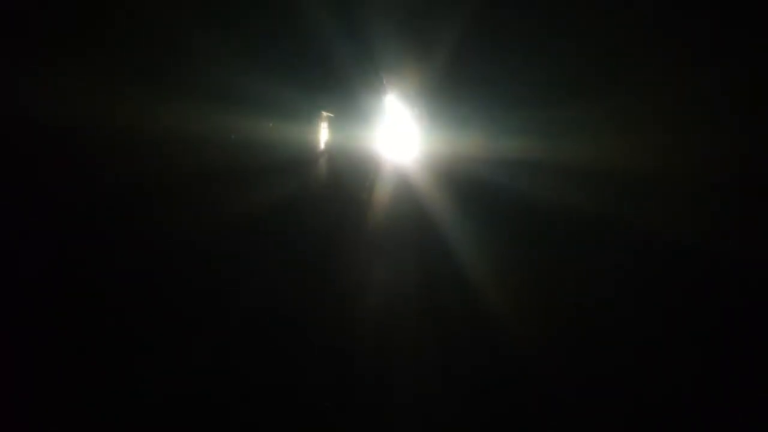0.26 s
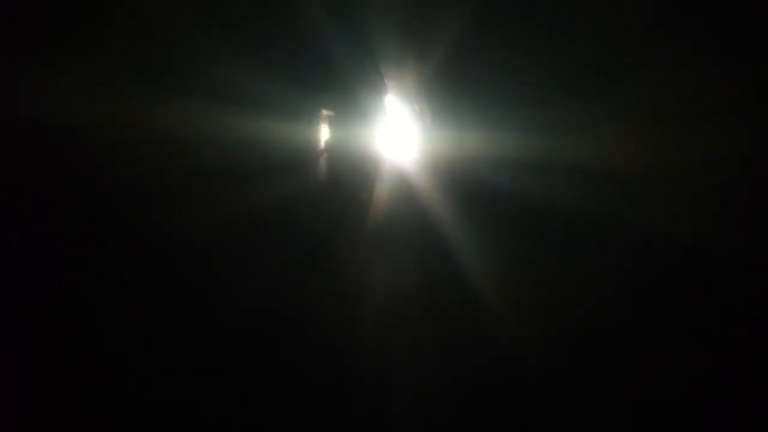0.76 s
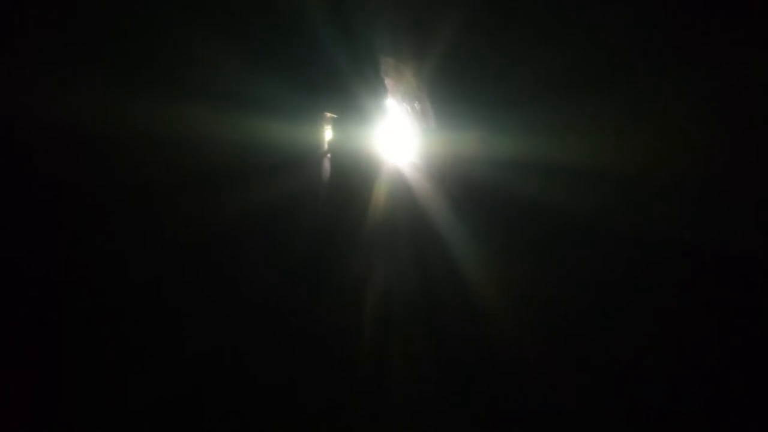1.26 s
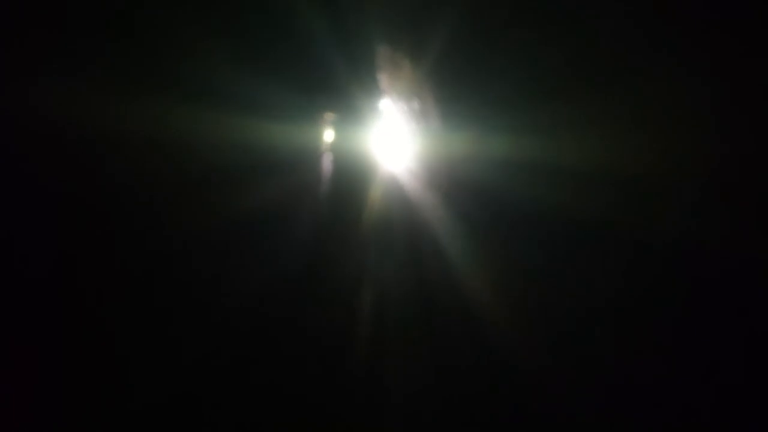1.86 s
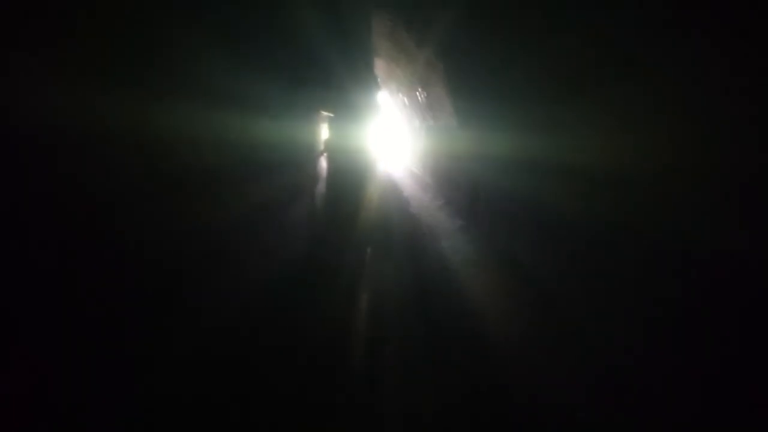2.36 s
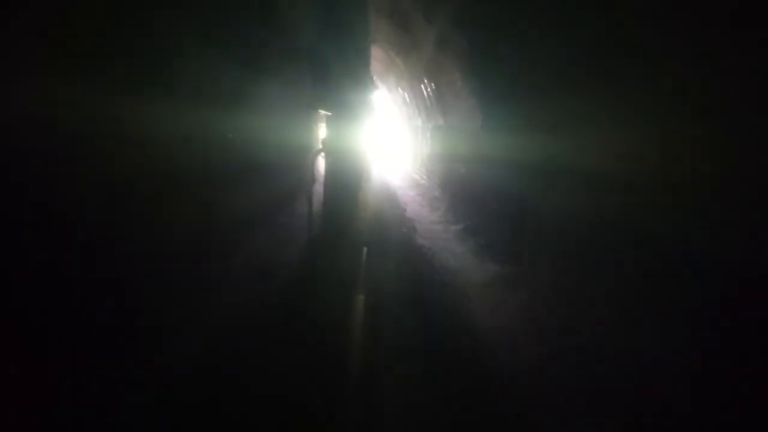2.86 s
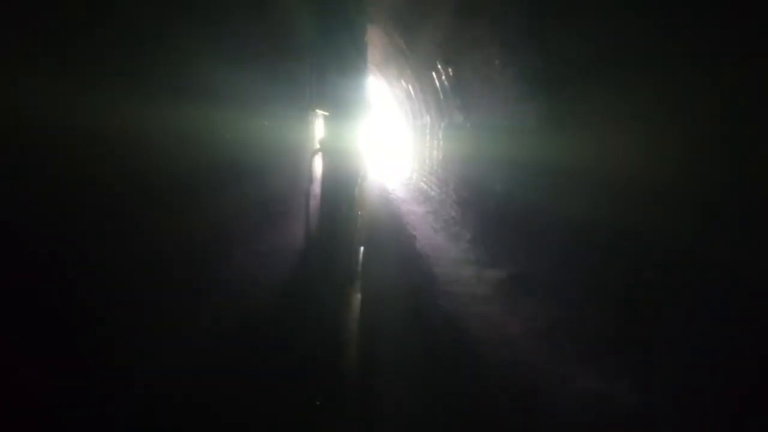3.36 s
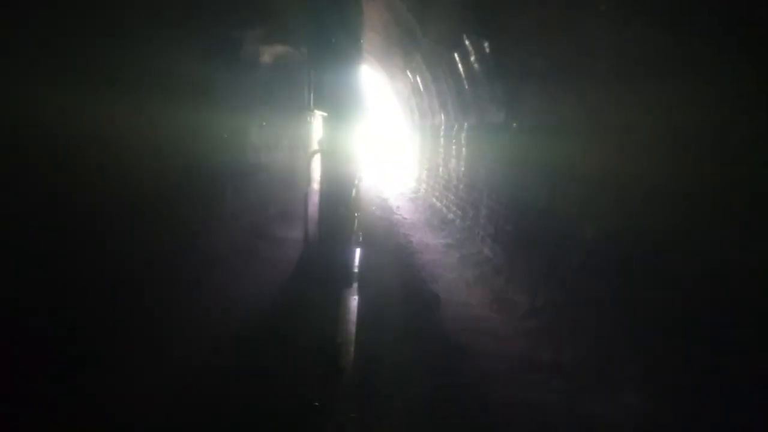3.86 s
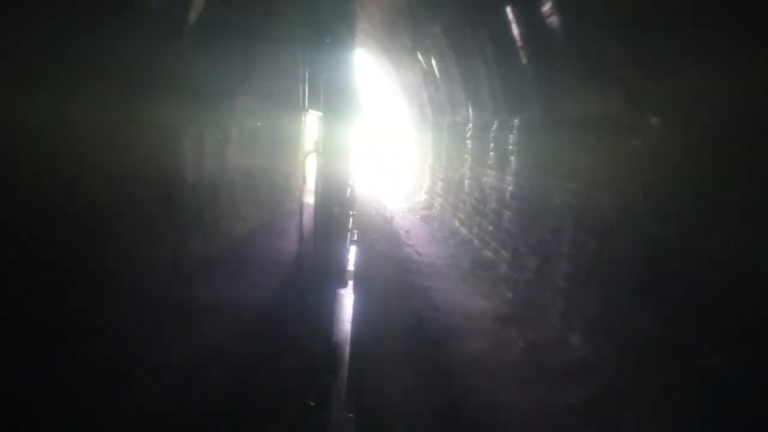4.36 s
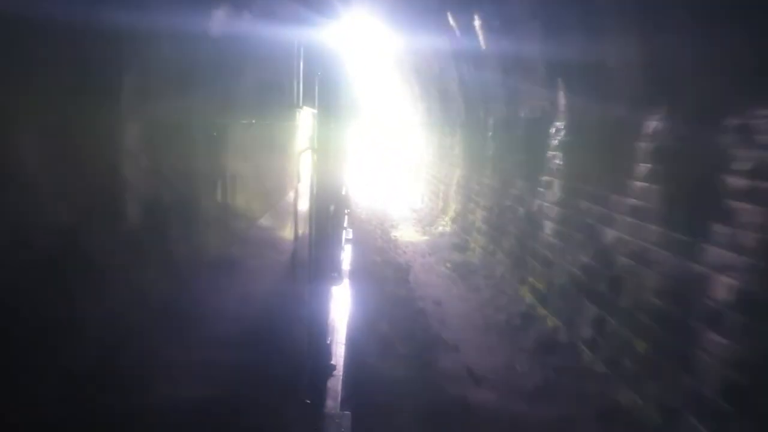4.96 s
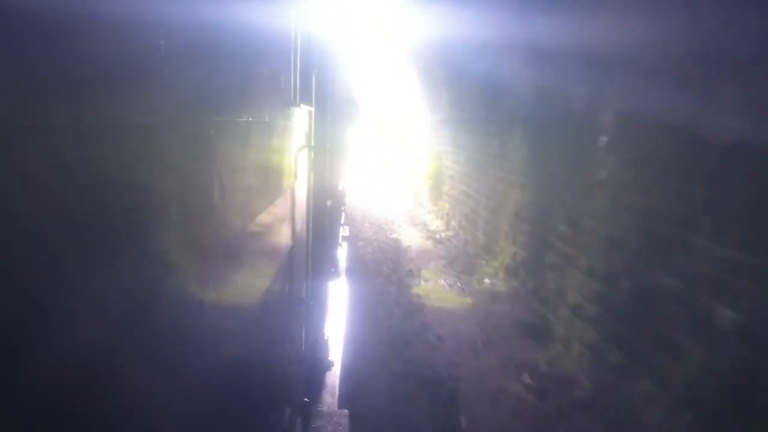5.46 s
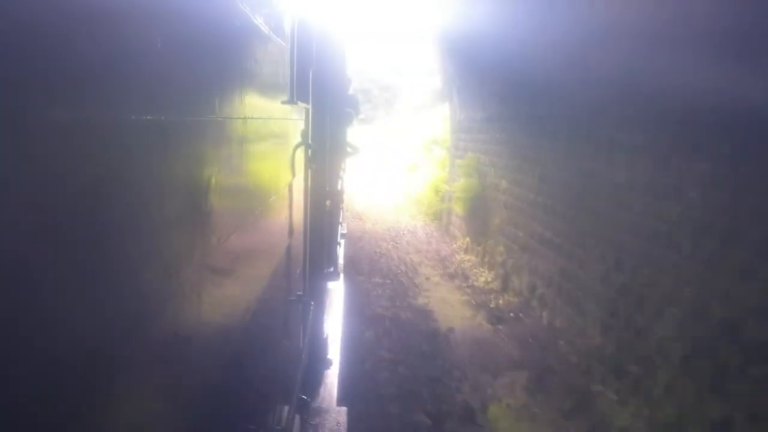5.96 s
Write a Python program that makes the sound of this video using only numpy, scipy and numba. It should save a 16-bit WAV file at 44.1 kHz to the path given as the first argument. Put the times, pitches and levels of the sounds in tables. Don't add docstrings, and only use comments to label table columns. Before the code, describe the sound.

A phone at a train window hears a reverberant tunnel. From 0 s an uneven diesel throb, deep and booming around 75 firings per second, surges and sags over a continuous low roar of wheels on rails. Muffled joint thuds and underframe knocks fall irregularly through the first 2.3 s, with a brief loose rattle near 1.1 s. From about 2.5 s the jolts become closer and brighter. At 2.9 s a coupling creaks low, then higher and louder at 3.1 s with a short metallic singing tone, and a heavy thud lands at 3.25 s. More clattering thumps follow at 3.6, 4.0, 4.6, 5.0-5.1 and 5.5 s, with fine treble rattle. The engine recedes, while a faint hissy turbo whistle, clearer from 3.8 s, keeps falling. Closing thuds cluster from 5.9 s to 6.2 s as the engine swells again.

```python
import sys
import numpy as np
from scipy import signal
from scipy.fft import rfft, irfft, next_fast_len
from scipy.io import wavfile
from scipy.ndimage import uniform_filter1d
from numba import njit

SR = 44100
rng = np.random.default_rng(int(sys.argv[2]) if len(sys.argv) > 2 else 0)


def gain_from_db(level_db):
    decades = np.asarray(level_db, float) / 20
    return 10 ** decades


def store_pcm(level_fs):
    pcm = np.round(np.clip(level_fs, -1, 1) * 32767).astype(np.int16)
    wavfile.write(sys.argv[1], SR, np.atleast_2d(pcm).T)


N = 274297
T = np.arange(N) / SR
SIZE = next_fast_len(N + 4096)
HZ = np.maximum(np.arange(SIZE // 2 + 1) * SR / SIZE, 1)


def level(x, db):
    return x * gain_from_db(db) / np.sqrt(np.mean(x ** 2))


def across(table, column):
    table = np.array(table, float)
    return np.interp(np.log(HZ), np.log(table[:, 0]), table[:, column])


def coloured(spectrum):
    return rfft(rng.standard_normal((2, SIZE))) * gain_from_db(across(spectrum, column=1))


def filtered(x, order, hz, kind="low"):
    return signal.sosfilt(signal.butter(order, hz, kind, fs=SR, output="sos"), x)


def walk(rate_hz):
    hold = int(SR / rate_hz)
    steps = np.repeat(rng.standard_normal(N // hold + 1), hold)
    return 1.351 * uniform_filter1d(uniform_filter1d(steps, hold), hold)[:N]


def phase(hz):
    return 2 * np.pi * np.cumsum(hz) / SR


def resonate(x, modes):
    out = 0
    for k, (hz, width_hz, db) in enumerate(modes):
        b, a = signal.iirpeak(hz, hz / width_hz, SR)
        ring = signal.lfilter(b, a, signal.lfilter(b, a, x))
        out = out + (-1) ** k * gain_from_db(db) * ring
    return out


def pulses(hz, jitter, scatter_db):
    uneven_hz = hz * (1 + jitter * walk(np.mean(hz)))
    cycle = np.cumsum(uneven_hz / SR).astype(int)
    size = gain_from_db(scatter_db * rng.standard_normal(cycle[-1] + 1))
    return np.diff(cycle, prepend=0) * size[cycle], cycle


@njit
def walls(x, lags, gain, damp):
    line, soft, out = np.zeros((8, 4096)), np.zeros(8), np.zeros((2, len(x)))
    for i in range(len(x)):
        total = 0.
        for k in range(8):
            soft[k] += (1 - damp) * (gain[k] * line[k, (i - lags[k]) & 4095] - soft[k])
            total += soft[k]
            out[k % 2, i] += soft[k]
        for k in range(8):
            line[k, i & 4095] = x[i] + soft[k] - total / 4
    return out


def tunnel(x, wet_db, t60_s):
    lags = rng.integers(700, 2800, size=8)
    echo = walls(x, lags, gain_from_db(-60 * lags / SR / t60_s), 0.1)
    return x * np.array([[1], [.6]]) + gain_from_db(wet_db) * echo


def swell(start_s, length_s, rise_s):
    fall = (start_s + length_s + .5 * rise_s - T) / 2
    return np.clip(np.minimum(T - start_s, fall) / rise_s, 0, 1)


def mouth(s):
    # [t/s, nearness/0-1]
    nearness = [
        (0, 0.099),
        (1., 0.12),
        (2.3, 0.15),
        (2.6, 0.69),
        (3.7, 0.62),
        (4.0, 1),
        (5.5, 0.93),
        (5.9, 0.6),
        (6.22, 1.),
    ]
    return np.interp(s, *np.transpose(nearness))


def engine():
    cylinders_db = [-7, -1.5, 0, -9.5, -0.5, 3.5]
    # [f/Hz, width/Hz, level/dB]
    exhaust = [(67.6, 59, -8), (108, 30.5, 0), (148.6, 15.8, -6), (230.9, 36, -8.5), (331.5, 40.7, -7.5)]
    # [t/s, level/dB]
    load = [(0, -20), (0.3, -17), (0.45, -20.5), (0.7, -16.5), (1.1, -21.5), (1.25, -22), (1.7, -18),
            (2.0, -21.5), (2.4, -24), (2.85, -20), (3.1, -27.5), (3.4, -24.5), (3.7, -28.5), (3.85, -22),
            (4.6, -27.5), (5.1, -29), (5.9, -23.5), (6.22, -19)]
    firing_hz = 75.92
    fire, cycle = pulses(np.full(N, firing_hz), jitter=.065, scatter_db=4.)
    fire = fire * gain_from_db(np.array(cylinders_db)[cycle % len(cylinders_db)])
    boom = tunnel(resonate(fire, exhaust), wet_db=-1.0, t60_s=1.34)
    boom = boom / np.sqrt(uniform_filter1d(boom[0] ** 2, SR // 6))
    return boom * gain_from_db(0.5 + np.interp(T, *np.transpose(load)))


def hum():
    # [t/s, length/s, start f/Hz, end f/Hz, level/dB]
    surges = [(0.0, .36, 80, 70, -18.5), (.41, .14, 73, 74, -17), (0.603, 0.23, 77, 73, -17),
              (.88, .2, 72, 70, -19), (1.138, .2, 75, 76, -16), (1.38, 0.16, 74, 71, -18.5),
              (1.582, .17, 72, 75, -17.5), (1.785, 0.19, 82, 83, -21), (2.177, 0.12, 76, 79, -21),
              (2.62, 0.13, 83, 82, -22), (2.77, 0.19, 74, 73, -20), (3.27, 0.22, 80, 80, -25),
              (3.714, .08, 78, 78, -17.5), (5.2, 0.12, 78, 78, -24), (5.89, 0.06, 78, 79, -19)]
    out = np.zeros(N)
    for s, length_s, hz0, hz1, db in surges:
        turn = phase(np.interp(T, [s, s + length_s], [hz0, hz1]))
        out += gain_from_db(db + 1) * np.sin(turn) * swell(s, length_s, rise_s=0.038)
    return out


def turbo():
    # [t/s, whistle f/Hz, level/dB]
    run_down = [(0, 7886, -65), (1, 7410, -63), (2, 7065, -61.5), (2.6, 6695, -58), (3.3, 6560, -62),
                (3.799, 6460, -51), (4.3, 6370, -51.5), (4.801, 6170, -55.5), (5.2, 6000, -55),
                (5.7, 5670, -54), (6.22, 5570, -59)]
    s, hz, db = np.transpose(run_down)
    turn = phase(np.interp(T, s, hz))
    blur = filtered(rng.standard_normal((2, 2, N)), 2, 190.)
    whistle = level(blur[0] * np.cos(turn) + blur[1] * np.sin(turn), 0) * gain_from_db(np.interp(T, s, db))
    rush = filtered(rng.standard_normal((2, 2, N)), 3, 600.)
    intake = rush[0] * np.cos(0.72 * turn) + rush[1] * np.sin(.94 * turn)
    return whistle + level(intake, -63.0)


def rolling():
    # [f/Hz, level/dB per Hz]
    roar = [(15, -31), (25, -16), (83, -0.5), (328, -6.5), (417, -12.5), (558, -11), (1000, -23),
            (2050, -32.5), (4920, -49), (6420, -46), (7530, -57), (8250, -71), (8750, -64), (9310, -55.5),
            (11500, -57), (12800, -64), (14400, -74)]
    mouth_gain_db = [-0.23, -0.4, 2]
    noise, sway, out = coloured(roar), walk(7.), 0
    for octave in np.arange(4.5, 14.5, .5):
        band = np.cos(np.pi / 2 * np.clip((np.log2(HZ) - octave) * 2, -1, 1)) ** 2
        place = np.interp(octave, [9, 11, 13.5], [0, 1, 2])
        slow_db = np.interp(place, np.arange(3), mouth_gain_db) * mouth(T)
        gain_db = slow_db + .5 * sway + .9 * walk(12.)
        out = out + irfft(noise * band, SIZE)[:, :N] * gain_from_db(gain_db)
    return level(out, -19.0)


def knocks():
    # [t/s, peak
    # level/dB, f/Hz, length/s]
    parts = [(0.333, -13, 137, 0.1), (0.625, -14, 128, 0.037), (0.675, -17, 270, 0.036),
             (0.747, -6, 133, 0.04), (0.925, -14, 154, 0.076), (1.172, -16, 498, 0.021),
             (1.259, -17, 130, 0.022), (1.535, -16.5, 119.8, 0.112), (1.725, -11, 313, 0.037),
             (1.834, -16, 278, 0.033), (2.144, -9, 292, 0.022), (2.144, -17, 522, 0.022),
             (2.172, -12, 132.4, 0.088), (2.417, -19, 265, 0.08), (2.515, -16, 519, 0.032),
             (2.572, -14, 298, 0.05), (3.008, -18, 563, 0.031), (3.079, -18, 246, 0.11),
             (3.127, -17.5, 600, 0.11), (3.213, -11, 126, 0.15), (3.27, -13, 290, 0.023),
             (3.625, -19.5, 155.2, 0.073), (3.629, -12, 281, 0.034), (3.646, -18, 490, 0.044),
             (3.67, -13, 313, 0.046), (3.705, -20, 544, 0.053), (3.963, -10.5, 144.3, 0.1),
             (3.984, -15, 281, 0.096), (3.998, -18, 592, 0.042), (4.567, -8, 280, 0.066),
             (4.632, -15, 563, 0.017), (4.729, -18, 291, 0.012), (4.769, -18, 512, 0.039),
             (4.843, -15, 285, 0.026), (4.923, -11, 142, 0.052), (4.954, -21, 250, 0.012),
             (5.022, -20, 536, 0.036), (5.057, -10, 128.3, 0.135), (5.087, -20, 525, 0.12),
             (5.096, -11.5, 274, 0.041), (5.435, -20, 122, 0.037), (5.457, -14.5, 267, 0.067),
             (5.519, -18, 514, 0.033), (5.596, -15, 155, 0.037), (5.93, -10, 292, 0.032),
             (6.058, -18.5, 510, 0.056),
             (2.64, -12.5, 160, 0.036), (3.04, -12, 95, 0.11), (3.42, -13.5, 180, 0.047),
             (5.86, -13.5, 205, .1), (5.97, -16.5, 540, .05), (6.08, -14.5, 500, .05),
             (6.175, -12, 230, .04), (5.14, -16, 390, 0.065), (3, -14.5, 350, 0.052),
             (0.0502, -28.5, 930, .5), (.55, -29, 930, 0.41)]
    out, rows = np.zeros(N), parts
    for (s, db, hz, length_s), chance in zip(rows, rng.random((len(rows), 2))):
        i = int(s * SR)
        t = T[:N - i][:SR]
        rise = 1 - np.exp(-(t / (0.25 * length_s)) ** 2)
        shape = rise * np.exp(-(t / (0.83 * length_s)) ** 2)
        turn = 2 * np.pi * hz * t
        neighbour = np.sin((.8 + .45 * chance[0]) * turn + 2 * np.pi * chance[1])
        out[i:i + len(t)] += gain_from_db(db - 3.5) * shape * (np.sin(turn) + 0.33 * neighbour)
    return out * np.array([[1], [.6]])


def loose(t, length_s):
    start = 1 - np.exp(-(t / .022) ** 1.5)
    return start * (np.exp(-(t / length_s) ** 1.15) + 0.18 * np.exp(-t / 0.14))


def joints():
    # [t/s, clatter level/dB, thud level/dB, thud f/Hz]
    far_joints = [(0.109, -22, -18, 102), (0.235, -19.5, -7.5, 155), (0.507, -22.5, -15.5, 156),
                  (0.640, -20, -7.5, 98.4), (1.054, -20.5, -9.5, 114.2), (1.272, -33.5, -10, 108.5),
                  (1.469, -25, -11, 224), (1.651, -20.5, -22, 148), (1.759, -29, -17, 340),
                  (2.14, -17, -12, 286.5), (2.326, -22.5, -21, 230)]
    # [t/s, clatter level/dB, thud level/dB, thud f/Hz, jolt length/s]
    near_joints = [(2.535, -19, -5.5, 346, 0.025), (2.583, -19, -37, 331.6, 0.046),
                   (2.967, -17.5, -21, 138.5, 0.1), (3.115, -19.5, -39, 396, 0.11),
                   (3.246, -15.5, 1.5, 108, 0.032), (3.442, -31.5, -25, 106, .028),
                   (3.625, -13, -2, 150, 0.052), (3.991, -13.5, -19, 133.4, 0.063),
                   (4.29, -24, -12, 323, 0.025), (4.45, -20.5, -31, 164, .059),
                   (4.584, -20, -10, 277, 0.046), (4.728, -19, -25, 151, 0.057),
                   (4.960, -16.5, -6.5, 193.4, 0.027), (5.098, -15.5, -5.5, 297, 0.057),
                   (5.46, -15, -4.5, 265.4, 0.067), (5.926, -17, -3.5, 327, 0.039),
                   (6.039, -16, -8, 211, 0.063), (6.159, -28.5, -6, 143.3, 0.056)]
    # [t/s, level/dB]
    shakes = [
        (1.130, -43),
        (1.385, -61),
        (2.229, -61),
        (2.605, -66),
        (2.965, -50),
        (3.849, -54),
        (5.31, -51),
    ]
    # [f/Hz, level/dB per Hz]
    clatter_colour = [(180, -23), (300, 3.5), (656, -13), (829, -6), (1030, -15.5), (2590, -27),
                      (3280, -37), (6330, -35), (8000, -43), (10400, -78), (17600, -120)]
    # [f/Hz, level/dB per Hz]
    rattle_colour = [(6500, -34), (8300, -9.5), (9600, -7.5), (10400, -5), (11100, -2.5), (12300, -5),
                     (13200, -4.5), (14300, -26), (14500, -75)]
    far_jolt_s, shake_s = 0.051, 0.031
    dull_hz, dull_share = 2560, .7

    clatter_env, rattle_env, thud = np.zeros((3, N))
    rows = [(*row, far_jolt_s) for row in far_joints] + list(near_joints)
    for (s, clatter_db, thud_db, thud_hz, length_s), chance in zip(rows, rng.random((len(rows), 2))):
        i = int(s * SR)
        t = T[:N - i][:SR // 2]
        shape = (1 - np.exp(-t / 0.019)) * np.exp(-(t / (1.476 * length_s)) ** 1.03)
        blow = shape * (1 - np.exp(-t / 0.0035)) / np.maximum(1 - np.exp(-t / 0.021), 1e-9)
        shape = shape + 0.11 * (1 - np.exp(-t / 0.037)) * np.exp(-t / .12)
        clatter_env[i:i + len(t)] += gain_from_db(clatter_db) * shape
        rattle_db = -39 + 1.3 * (clatter_db + 15) - 20 * (1 - mouth(s))
        rattle_env[i:i + len(t)] += gain_from_db(rattle_db) * loose(t, length_s)
        turn = 2 * np.pi * thud_hz * t * (1 - 0.242 * t)
        second = np.sin((1.15 + 0.24 * chance[0]) * turn + 2 * np.pi * chance[1])
        thud[i:i + len(t)] += gain_from_db(thud_db) * (np.sin(turn) + 0.5 * second) * blow ** 1.17
    for s, db in shakes:
        i = int(s * SR)
        rattle_env[i:i + SR // 2] += gain_from_db(db) * loose(T[:SR // 2], shake_s)
    rattle_env += gain_from_db(-62.0)

    grain = gain_from_db(1.3 * walk(40.))
    clatter = level(irfft(coloured(clatter_colour), SIZE)[:, :N], -1.17) * clatter_env * grain
    treble = filtered(clatter, 2, dull_hz, "high")
    bass = filtered(clatter, 2, dull_hz)
    clatter = bass - treble * (1 - dull_share * np.clip(1 - mouth(T), 0, 1))
    rattle = level(irfft(coloured(rattle_colour), SIZE)[:, :N], -1.1) * rattle_env * grain
    return clatter + rattle + gain_from_db(-9.5) * tunnel(thud, wet_db=-18.0, t60_s=0.25)


def creaks():
    # [t/s, length/s, level/dB]
    pin = [
        (2.615, .04, -64),
        (3.25, .05, -70),
        (3.67, .03, -72),
        (3.99, .11, -57),
        (4.56, .04, -69),
        (5.15, .03, -66),
        (5.3, .03, -70),
        (5.465, .05, -61),
        (6.07, .04, -67),
    ]
    # [t/s, length/s, start slip rate/Hz, end slip rate/Hz, level/dB]
    slips = [
        (2.917, 0.165, 287, 284, -25.5),
        (3.099, 0.13, 404, 401, -20),
    ]
    # [f/Hz, width/Hz, level/dB]
    coupling = [(426, 95, -5), (574, 270, -3), (845, 150, 4), (1760, 610, -12.5), (2200, 1400, -17.5)]
    # [t/s, length/s, start f/Hz, end f/Hz, level/dB]
    tones = [
        (3.112, .13, 671, 655, -16),
        (6.056, 0.02, 6320, 6500, -38),
        (3.115, .11, 408, 402, -15.5),
        (3.125, 0.073, 815, 890, -24),
        (3.13, 0.046, 1625, 1612, -35),
        (3.19, .08, 1670, 1640, -36),
        (3, .06, 1960, 2010, -40),
        (3.13, 0.12, 2430, 2410, -46),
    ]
    pin_hz = 14350
    out = np.zeros(N)
    for s, length_s, hz0, hz1, db in slips:
        slip_hz = np.interp(T, [s, s + length_s], [hz0, hz1])
        slip, _ = pulses(slip_hz, jitter=1100 / hz0 ** 2, scatter_db=2.5)
        out += level(resonate(slip, coupling), db) * swell(s, length_s, rise_s=0.03)
    pin_tones = [(s, length_s, pin_hz, pin_hz, db) for s, length_s, db in pin]
    for s, length_s, hz0, hz1, db in [*tones, *pin_tones]:
        turn = phase(np.interp(T, [s, s + length_s], [hz0, hz1]))
        out += gain_from_db(db) * np.sin(turn) * swell(s, length_s, rise_s=0.17 * length_s)
    return tunnel(out, wet_db=-12, t60_s=.4)


def scene():
    return engine() + hum() + turbo() + rolling() + knocks() + joints() + creaks()


def gate(x):
    from_hz, gate_db, jitter_db, follow = 6900, -94, 3., .9
    rise_hz, rise_db_per_khz = 11800, 3.
    hz, _, z = signal.stft(x, SR, "hann", 2048, scaling="psd")
    power = uniform_filter1d(np.abs(z) ** 2, size=2, axis=1)
    busy = power[:, hz > from_hz].mean(axis=(0, 1))
    patches = np.repeat(rng.standard_normal((257, len(busy))), 4, axis=0)[:len(hz)]
    rise_db = rise_db_per_khz * np.maximum(hz - rise_hz, 0)[:, None] / 1000
    limit = gain_from_db(2 * (gate_db + rise_db + jitter_db * patches))
    limit = limit * (busy / np.median(busy)) ** follow
    keep = (power > limit) | (hz < from_hz)[:, None]
    return signal.istft(z * keep, SR, "hann", 2048, scaling="psd")[1][:, :N]


def low_pass(x):
    return signal.sosfilt(signal.butter(12, 14490, fs=SR, output="sos"), x)


def record(dry):
    # [f/Hz, left minus right level/dB, likeness/-1..1, left lead/rad]
    port_table = [(50, -2, 1, 0.42), (120, -0.5, 0.9, 0.37), (251, 2, 0.99, 0.34), (444, 5.5, 0.87, 0.51),
                  (735, 8, 0.079, 0), (1210, 6, -0.49, 0), (1900, 8, -0.14, 0.047), (2500, 6.5, .2, 0.075),
                  (3400, 6.5, -0.19, 0), (4200, 5.5, 0.21, 0), (5000, 4, -0.052, 0), (5470, 10.5, 0.91, 0),
                  (6450, 8.5, 0.85, 0.13), (7640, 1.5, 0.86, 0.037), (8860, -8.5, 0.17, 0.05),
                  (10800, -1.5, 0.94, 0.044), (14100, -1.5, 0.7, 0)]
    near, other = rfft(np.pad(dry, ((0, 0), (0, SIZE - N)), "reflect"))
    like = np.clip(across(port_table, column=2), -.999, .999)
    tilt = gain_from_db(across(port_table, column=1) / 2)
    lag = np.exp(-1j * across(port_table, column=3))
    right = like * near * lag + np.sqrt(1 - like ** 2) * other
    gain = 2 / np.sqrt(tilt ** 2 + tilt ** -2 + 2 * like)
    ports = irfft(np.array([near * tilt, right / tilt]) * gain, SIZE)[:, :N]
    ports = np.tanh(.65 * ports) / .65
    return low_pass(gate(ports))


dry = scene()
out = record(dry)
store_pcm(out)
```